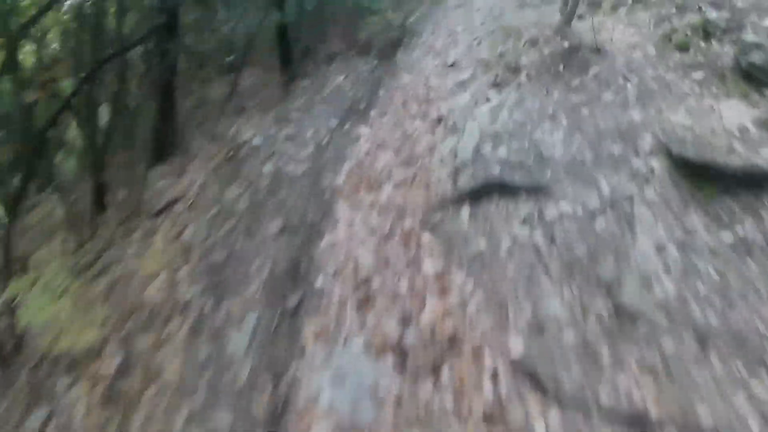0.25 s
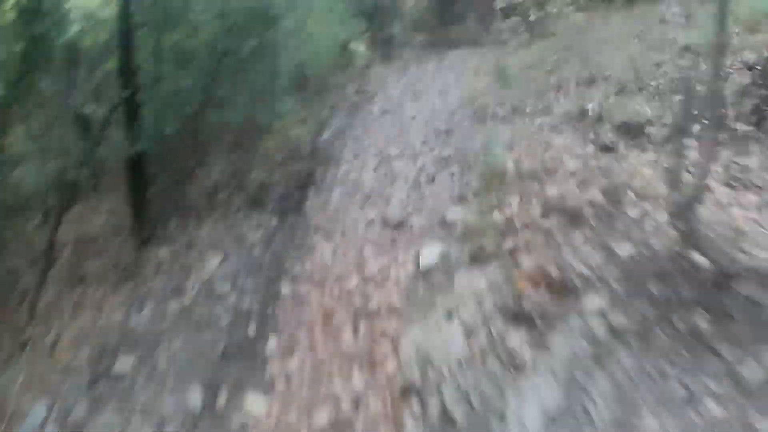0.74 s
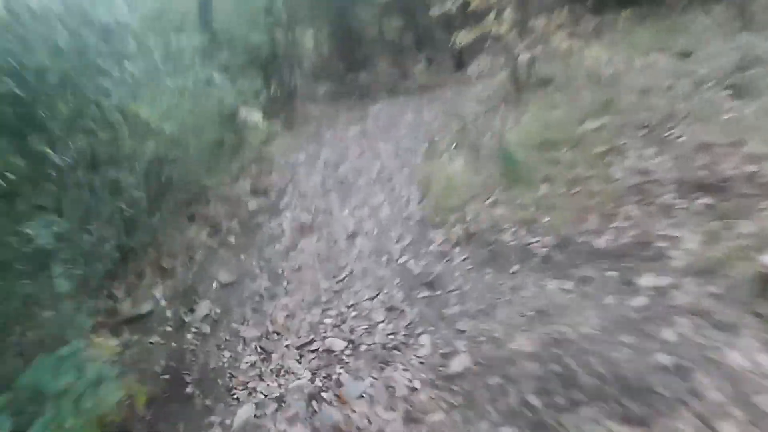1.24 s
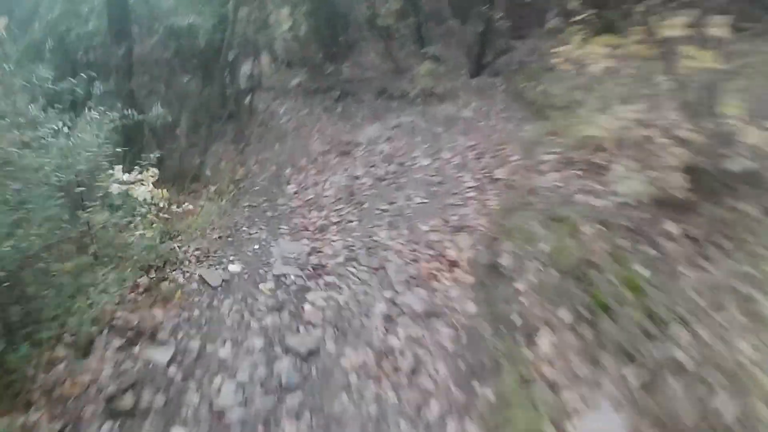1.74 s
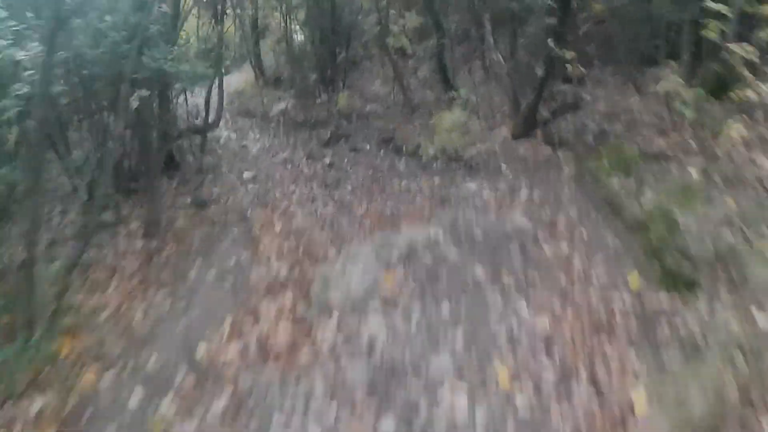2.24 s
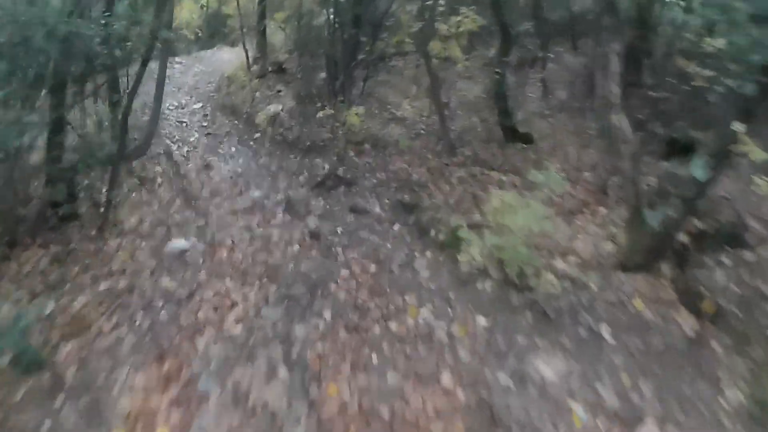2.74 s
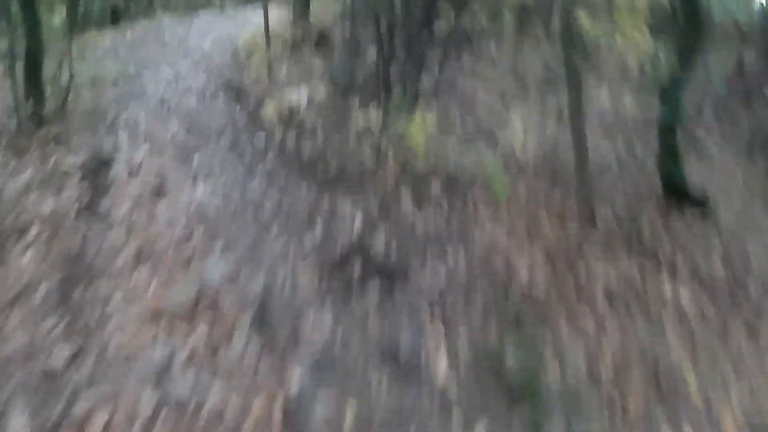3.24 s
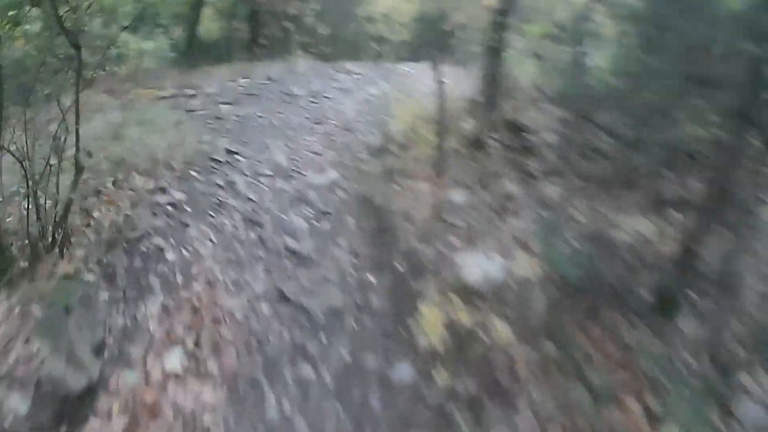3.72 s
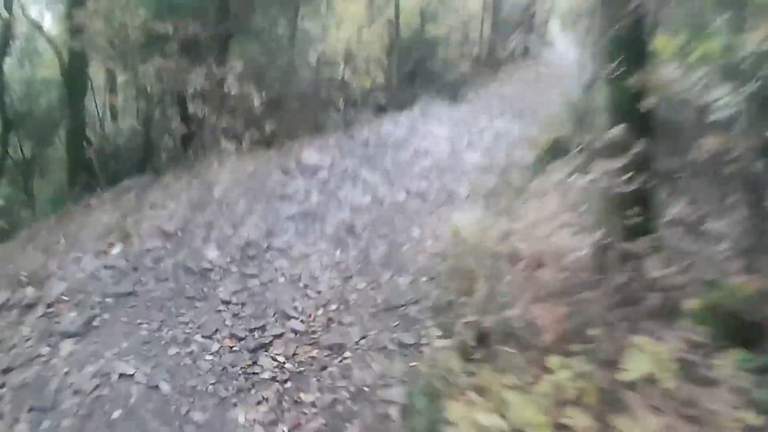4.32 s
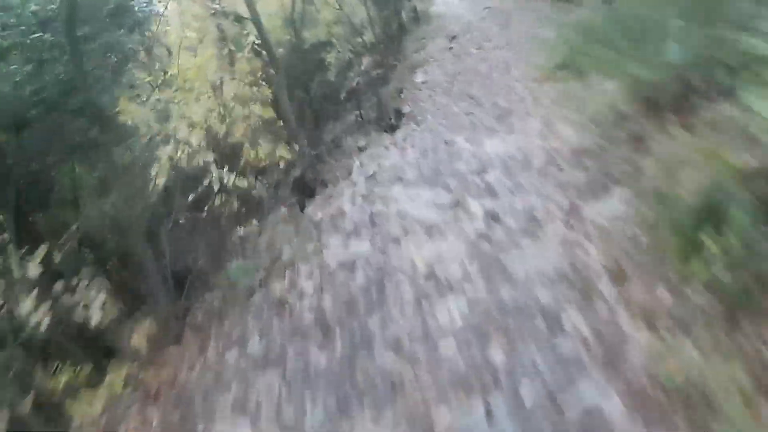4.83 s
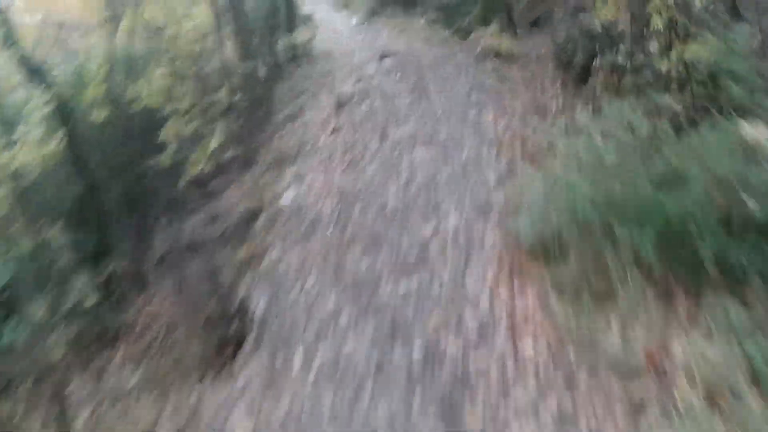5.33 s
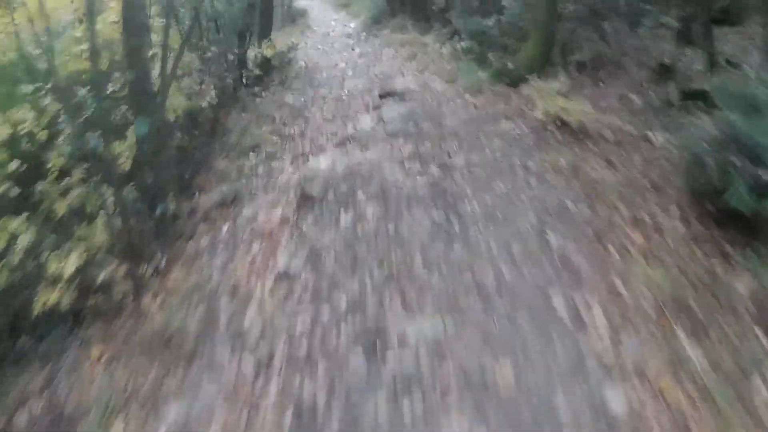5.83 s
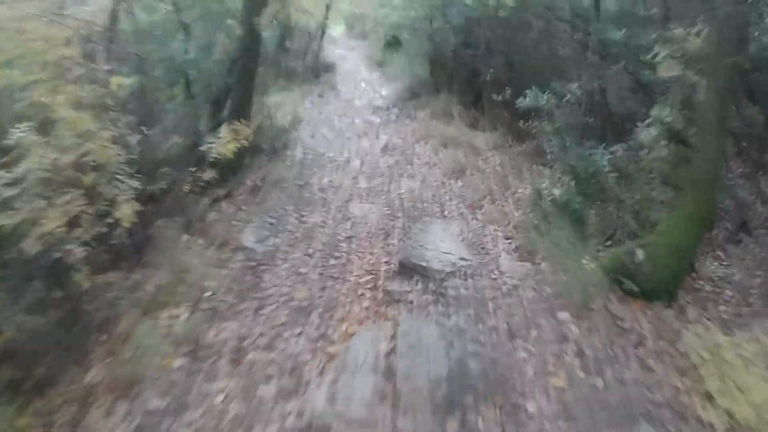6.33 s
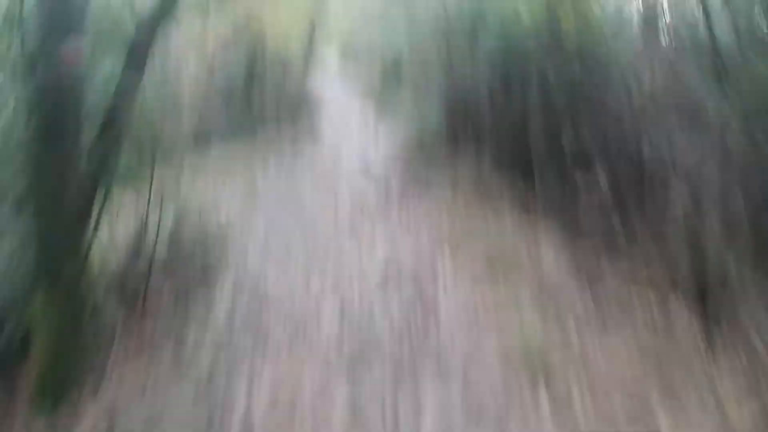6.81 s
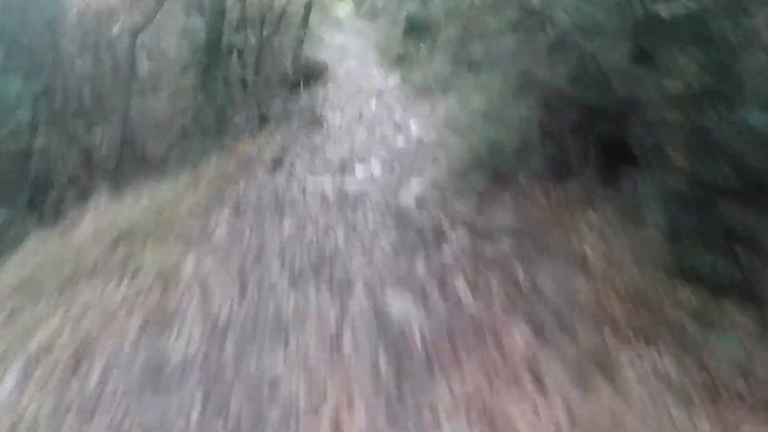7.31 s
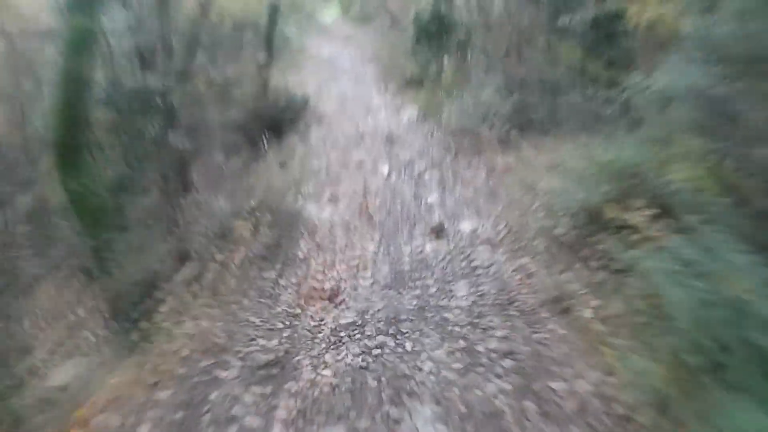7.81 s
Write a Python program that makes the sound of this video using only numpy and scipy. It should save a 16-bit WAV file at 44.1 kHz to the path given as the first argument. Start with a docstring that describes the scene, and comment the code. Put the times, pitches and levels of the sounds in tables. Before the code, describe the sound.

Continuous rough rolling outdoors, close and dry: drumming tyres, crackling loose stones and uneven metallic and hollow chain knocks. Short slides scrape up bursts of grit, and brief lulls open where the tyres run light. Rocks hit with dull booms and rough knocks, the hardest clack after the midpoint. Gusty low wind rumbles on the bike-mounted microphone above a faint steady hiss, and the stony crunch thickens towards the finish.

```python
"""Mountain bike on a rocky trail

A mountain bike coasts fast down a rocky woodland trail, heard through a microphone that rides along.
Tyre hum and stone crunch are trains of random impacts, filtered by the resonances of tyre and bike.
Chain and stones clack as short contact forces that ring the bike; rocks thump as heavy pushes with
a decaying tyre boom and a noisy knock. Wind is low-frequency noise, over a faint steady hiss."""
import sys
import numpy as np
from scipy import signal
from scipy.fft import rfft, irfft, next_fast_len
from scipy.io import wavfile
from scipy.ndimage import uniform_filter1d

SR = 44100
rng = np.random.default_rng(int(sys.argv[2]) if len(sys.argv) > 2 else 0)


def master_out(mix):
    """Clip the mix to full scale and print it as 16-bit PCM to the path in sys.argv[1]."""
    frames = np.transpose(np.atleast_2d(mix))
    ceiling = np.clip(frames, -1, 1)
    pcm = np.round(ceiling * 32767).astype(np.int16)
    wavfile.write(sys.argv[1], SR, pcm)


N = 355446
TIME = np.arange(N) / SR


def from_db(db):
    """Logarithmic level: decibels to amplitude gain."""
    return 10 ** (np.asarray(db) / 20)


def rms_one(x):
    """Effective value: scale to rms 1."""
    return x / np.sqrt(np.mean(x ** 2) + 1e-20)


def peak_one(x, size):
    """Short-time power: scale so that the loudest stretch of size samples has rms 1."""
    return x / np.sqrt(uniform_filter1d(x ** 2, size).max() + 1e-20)


def in_time(rows):
    """Linear interpolation: the level of a (time, level) curve at every sample."""
    s, level_db = np.transpose(rows)
    return np.interp(TIME, s, level_db)


def bump(s, half_s):
    """Gaussian pulse: a smooth rise and fall of height 1 around time s."""
    return np.exp(-((TIME - s) / half_s) ** 2)


def drift(rate_hz):
    """Low-passed noise: a slow random fluctuation of rms 1."""
    count = N // 20  # computed at a twentieth of the sample rate
    hz = np.fft.rfftfreq(count, 20 / SR)
    slow = irfft(rfft(rng.standard_normal(count)) / (1 + (hz / rate_hz) ** 2))
    return np.interp(np.arange(N) / 20, np.arange(len(slow)), rms_one(slow))


def band_pass(x, low_hz, high_hz, order=4):
    """Causal Butterworth filter: a maximally flat pass band."""
    sos = signal.butter(order, [low_hz, high_hz], "band", fs=SR, output="sos")
    return signal.sosfilt(sos, x + 1e-18)


def resonate(x, spectrum, modes=()):
    """Minimum-phase filtering: a broad spectrum with resonant humps, made causal through its cepstrum."""
    size = 2 * next_fast_len(len(x))
    hz = np.fft.rfftfreq(size, 1 / SR) + 1
    points, levels = np.transpose(spectrum)
    db = np.interp(np.log(hz), np.log(points), levels)
    for centre, width, lift in modes:
        db = db + lift / (1 + ((hz - centre) / width) ** 2) ** 2
    # folding the cepstrum onto positive times gives minimum phase
    cepstrum = irfft(np.log(from_db(db)))
    cepstrum[1:size // 2] *= 2
    cepstrum[size // 2 + 1:] = 0
    return irfft(rfft(x, size) * np.exp(rfft(cepstrum)))[:len(x)]


def grains(per_s, spread_db):
    """Random (Poisson-like) impulse train: tiny impacts of uneven size and either sign."""
    sizes = from_db(spread_db * np.minimum(rng.exponential(1, N), 4))
    struck = rng.random(N) < per_s / SR
    return struck * sizes * rng.choice([-1, 1], N)


def add(out, s, sound):
    """Superposition: mix a sound in at time s."""
    at = max(0, round(s * SR))
    out[at:at + len(sound)] += sound[:max(0, N - at)]


def hiss():
    """White noise: equal power at every frequency, at a constant level."""
    return from_db(-60.5) * rng.standard_normal(N)


# Spectrum of the wind noise: (frequency [Hz], level per Hz [dB])
WIND_SPECTRUM = [(4, -11), (10, 4.5), (16, 7), (25, -7.5), (40, -14), (60, -22), (120, -34.5), (300, -53),
                 (1000, -75)]
# Heavy jolts shake the microphone and lift the low rumble: (time [s], lift [dB], half length [s])
SHAKES = [(3.346, 7.5, 0.14), (4.05, 12.5, 0.15), (4.594, 7.5, 0.24), (5.435, 8.5, 0.071),
          (6.913, 10.5, 0.1), (7.767, 0, 0.14)]
WIND_DB, CRUISE_ROAR_DB = -37.5, -46.5  # wind and tyre roar at cruising speed
WIND_FOLLOWS = 0.4  # wind dB per dB of change in the roar


def wind(roar_db):
    """Turbulent pressure: eddies rock the microphone slowly and deeply, more with speed and when jolts shake
    it."""
    shakes_db = sum(lift_db * bump(s, half_s) for s, lift_db, half_s in SHAKES)
    speed_db = WIND_FOLLOWS * (roar_db - CRUISE_ROAR_DB)
    wind_db = WIND_DB + speed_db + shakes_db + 1.02 * drift(12.4)
    eddies = resonate(rng.standard_normal(N + SR), WIND_SPECTRUM)[SR:]
    # even out the noise's own swells, so that wind_db sets the level
    swell = np.sqrt(uniform_filter1d(band_pass(eddies, 20.1, 90) ** 2, SR // 6) + 1e-12)
    return eddies / swell * from_db(wind_db)


# Rolling speed, as the roar of the tyres: (time [s], level [dB])
ROAR = [(0.0, -49), (0.65, -50.5), (0.99, -44.5), (1.28, -46.5), (1.84, -42), (2.69, -47), (3.23, -40),
        (3.48, -50), (4.13, -46.5), (6.06, -44), (6.2, -43), (8.06, -38)]


def rolling_level():
    """Rolling noise grows with speed: the roar level stands for the speed throughout."""
    return in_time(ROAR)


# Spectrum of the tyre roar: (frequency [Hz], level per Hz [dB])
TYRE_SPECTRUM = [(30, 13), (60, -8), (110, -10), (170, 6), (240, 3), (420, -1), (600, -0.5), (800, -6.5),
                 (1100, -2.5), (2000, -35.5)]
# Hollow tyre and rim resonances: (frequency [Hz], width [Hz], lift [dB])
TYRE_MODES = [(99, 31, 18), (291.2, 19, 10.5), (342, 43.4, 12.5), (526, 63, 6), (718, 7.6, 8.5)]


def tyres(roar_db):
    """Cavity resonance: knobs drum on the dirt and sound the hollow tyres."""
    roar = resonate(grains(per_s=2500, spread_db=1.5), TYRE_SPECTRUM, TYRE_MODES)
    roar = roar / np.std(band_pass(roar, 230, 900))
    return roar * from_db(roar_db + drift(8.3))


# Amount of loose stone under the tyres, as its crunch: (time [s], level [dB])
GROUND = [(0.0, -47), (0.43, -42), (0.76, -44), (1.82, -41), (2.62, -45.5), (2.8, -47), (3.03, -46),
          (3.23, -37), (3.3, -37), (3.61, -47), (3.77, -47.5), (3.93, -42.5), (6.31, -43), (6.76, -47),
          (6.96, -37.5), (7.32, -44), (7.56, -38.5), (8.06, -38)]
# Tyres go light or cross smooth dirt and the crunch drops: (time [s], dip [dB], half length [s])
LULLS = [(0.181, 8.5, 0.018), (0.6, 9, 0.031), (2.92, 14, 0.053), (3.711, 12, 0.023), (4.786, 6, 0.047),
         (5.798, 13, 0.01), (6.66, 6, 0.041)]


def ground_level():
    """Contact noise follows the loose stone under the tyres and dips where they go light or run smooth."""
    dips_db = sum(dip_db * bump(s, half_s) for s, dip_db, half_s in LULLS)
    return in_time(GROUND) - dips_db


# A tyre slides or bites into a loose patch:
# (time [s], rattle lift [dB], grit lift [dB], half length [s])
SLIDES = [(1.82, 2, 9, 0.025), (2.039, 13, 7.5, 0.012), (2.263, 7.5, 5, 0.014), (3.2, 14, 3, 0.011),
          (3.321, 4, 1, 0.051), (3.768, 8, 3, 0.019), (3.856, 12.5, 10, 0.0077), (4.693, 7, 10, 0.012),
          (5.54, 5, 7, 0.049), (6.115, 6.5, 8, 0.06)]


def slide_lifts():
    """Sliding friction: brief lifts of coarse rattle and fine grit, each by its own amount."""
    coarse_db = sum(lift_db * bump(s, half_s) for s, lift_db, _, half_s in SLIDES)
    fine_db = sum(lift_db * bump(s, half_s) for s, _, lift_db, half_s in SLIDES)
    return coarse_db, fine_db


def crunch(ticks, edges_hz, clumps_db, patchy_db):
    """Independent modulation: each size of stone swells by itself within the common clumps."""
    sizes = [band_pass(ticks, low, high) for low, high in zip(edges_hz, edges_hz[1:])]
    swelling = sum(part * from_db(clumps_db + patchy_db * drift(28)) for part in sizes)
    return swelling / np.std(sum(sizes))


# Spectrum of stone ticks: (frequency [Hz], level per Hz [dB])
STONE_SPECTRUM = [(300, 11), (700, -3), (1200, -9), (2200, 3.5), (2800, -5), (4500, -2.5), (6000, -1.5),
                  (6800, -13), (9000, -20), (12000, -26), (16000, -67)]
# Resonances of the bike, shared by stones and clacks: (frequency [Hz], width [Hz], lift [dB])
BIKE_MODES = [(1027, 312, 13.5), (1360, 153, 18), (1539, 174, 14), (1951, 92, 6.5), (2200, 56, 1),
              (2630, 74, 4.5), (3070, 250, 10), (3420, 318, 18), (4063, 340, 14.5), (4830, 357, 14),
              (5360, 530, 5), (7710, 1000, 5), (9770, 700, 6.5)]
RATTLE_DB, GRIT_DB, LEAF_DB = -3.5, -4, -18.5  # coarse gravel, fine grit, dry leaves, re the crunch
# knobs bite into clumps of stones: rate [1/s], ceiling of the lift [dB], decay time [s]
BITES_PER_S, BITE_DB, BITE_S = 20, 7, 0.018


def gravel(rattle_db, grit_db, leaf_db):
    """Granular impacts: stones shift in abrupt, dying clumps and ring the bike; leaves crackle on top."""
    starts = rng.random(N) < BITES_PER_S / SR
    bites = signal.lfilter([1], [1, -np.exp(-1 / (BITE_S * SR))], starts + 1e-18)
    bites = np.tanh(bites)  # overlapping bites saturate
    clumps_db = 3.16 * drift(27.5) + BITE_DB * (bites - bites.mean())
    ticks = resonate(grains(per_s=4200, spread_db=2.0), STONE_SPECTRUM, BIKE_MODES)
    rattle = crunch(ticks, (710, 1203, 1743, 2590), clumps_db, patchy_db=2.5)
    grit = crunch(ticks, (2470, 3800, 4310, 5700), clumps_db, patchy_db=1.5)
    leaves = crunch(ticks, (6400, 8800, 13000), 0.81 * clumps_db, patchy_db=0.5)
    stones = from_db(rattle_db + RATTLE_DB) * rattle + from_db(grit_db + GRIT_DB) * grit
    return stones + from_db(leaf_db + LEAF_DB) * leaves


def pebbles(rattle_db, grit_db):
    """Size sets pitch: single pebbles scuff the bike as short noise bursts, each size in its own band."""
    out = 0
    fade = np.exp(-1 / (0.0011 * SR))
    for hz in np.geomspace(1700, 7000, num=7):
        touches = np.abs(grains(per_s=13, spread_db=2.0))
        envelope = signal.lfilter([1], [1, -2 * fade, fade ** 2], touches + 1e-18)  # rises, then fades
        scuff = envelope * rng.standard_normal(N)
        tick = band_pass(scuff, hz / 1.3, hz * 1.3, order=2)
        out = out + rms_one(tick) * from_db(rattle_db if hz < 2800 else grit_db)
    return from_db(-20.0) * resonate(out, STONE_SPECTRUM, BIKE_MODES)


# Spectrum of a rock's push: (frequency [Hz], level per Hz [dB])
THUMP_SPECTRUM = [(20, -15), (50, -3), (90, 0), (200, -3), (300, -9.5), (500, -30.5), (1000, -53),
                  (3000, -72)]
# Low flex of the frame: (frequency [Hz], width [Hz], lift [dB])
FRAME_MODE = (212, 55, 4.9)
# Rocks and roots jolt the bike: (time [s], thump level [dB], hardness [0-1])
JOLTS = [(0.791, -36.5, 0.05), (1.499, -39.5, 0.05), (1.617, -35.5, 0.17), (3.05, -35.5, 0.01),
         (3.134, -17, 0.41), (3.4, -23.5, 0.4), (4.15, -33.5, 0.75), (4.636, -40, 0), (5.358, -42, 0),
         (5.5, -26.5, 0.76), (6.827, -24.5, 0.84), (6.88, -16, 0.5), (6.924, -24, 1), (7.169, -29.5, 0.26),
         (7.383, -28.5, 0.45)]
TYRE_BOOM_HZ, TYRE_BOOM_S = 93.6, 0.014  # pitch and decay time
BOOM_RANGE_DB, KNOCK_RANGE_DB = [13.0, -15], [-22.5, 3]  # re thump, at hardness 0 and 1


def jolts():
    """Impact hardness sets bandwidth: soft blows boom in the tyre, hard ones give a rough knock."""
    out, t = np.zeros(N), np.arange(SR // 5) / SR
    for s, level_db, hardness in JOLTS:
        boom_db = np.interp(hardness, [0, 1], BOOM_RANGE_DB)
        knock_db = np.interp(hardness, [0, 1], KNOCK_RANGE_DB)
        shudder = rng.standard_normal((2, len(t)))
        force = 0.036 * shudder[0] * np.exp(-t / 0.024) - (t == 0)  # one push, then a shudder
        push = peak_one(resonate(force, THUMP_SPECTRUM, [FRAME_MODE]), size=256)
        boom = -np.sin(2 * np.pi * TYRE_BOOM_HZ * t) * np.exp(-t / TYRE_BOOM_S)
        knock = peak_one(band_pass(shudder[1] * np.exp(-t / 0.0066), 320, 1330), size=256)
        add(out, s, from_db(level_db) * (push + from_db(boom_db) * boom + from_db(knock_db) * knock))
    return out


# Spectrum of a hard contact with the bike: (frequency [Hz], level per Hz [dB])
STRIKE_SPECTRUM = [(950, -12), (1450, -8), (2400, 4.5), (2900, -8.5), (6000, -5), (10000, -24.5),
                   (14000, -35)]
HOLLOW_BELOW_HZ, HOLLOW_DB_PER_OCTAVE = 2220, 13.5  # the lower a clack rings, the more hollow body
RING_LIFT_DB = 9.5  # lift of the main ring
DEBRIS_DB, DEBRIS_S = -16, 0.016  # loose bits after a clack: level re the snap, decay time


def clack(ring_hz, contact_ms, edge_db):
    """Forced resonance: a contact rings the bike, ragged if long, and loose bits patter on faintly."""
    t = np.arange(SR // 8) / SR
    age = 1000 * t / contact_ms
    ragged = from_db(5.3 * rms_one(uniform_filter1d(rng.standard_normal(len(t)), size=70)))
    onset = np.minimum(t / 0.00062, 1)
    force = onset * (np.exp(-age ** 2) + from_db(-15.5) * np.exp(-t / 0.011)) * ragged
    ring = (ring_hz, ring_hz / 10, RING_LIFT_DB)
    hit = resonate(force * rng.choice([-1, 1], len(t)), STRIKE_SPECTRUM, list(BIKE_MODES) + [ring])
    hollow = from_db(HOLLOW_DB_PER_OCTAVE * np.log2(HOLLOW_BELOW_HZ / ring_hz))
    body = hollow * peak_one(band_pass(hit, 1210, 2605), size=128)
    snap = peak_one(band_pass(hit, 2810, 6160), size=128)
    edge = from_db(edge_db) * peak_one(band_pass(hit, 6840, 0.48 * SR), size=128)
    patter = rng.standard_normal(len(t)) ** 3 * np.minimum(t / 0.00073, 1) * np.exp(-t / DEBRIS_S)
    debris = from_db(DEBRIS_DB) * peak_one(resonate(patter, STONE_SPECTRUM, BIKE_MODES), size=128)
    return (body + snap + debris) / np.hypot(1, hollow) + edge


CHATTER_DB, CHATTER_SPREAD_DB = 6.5, 0.5  # level re the crunch, and its spread either way
CHATTER_EDGE_DB, CHATTER_CONTACT_MS = -10.5, 2.8  # bright edge re level; middle contact time


def chatter(ground_db, count):
    """Modal excitation: light clacks at uneven intervals ring strong bike modes, louder on stony ground."""
    out = np.zeros(N)
    rings_hz = [hz for hz, _, lift_db in BIKE_MODES if hz > 1200 and lift_db > 11]
    for k, (delay, place, force, length) in enumerate(rng.random((count, 4))):
        at = int((k + delay) / count * N)
        level_db = ground_db[at] + CHATTER_DB + CHATTER_SPREAD_DB * (2 * force - 1)
        contact_ms = CHATTER_CONTACT_MS * 2 ** (2 * length - 1)
        ring_hz = rings_hz[int(place * len(rings_hz))]
        add(out, at / SR, from_db(level_db) * clack(ring_hz, contact_ms, CHATTER_EDGE_DB))
    return out


# Chain and stones hit the bike hard:
# (time [s], level [dB], main ring [Hz], contact [ms], bright edge re level [dB])
CLACKS = [(0.2602, -29.5, 3470, 1.7, -34), (0.313, -20.5, 3070, 4.6, -22), (0.3378, -23.5, 3420, 1.5, -34),
          (0.4612, -29, 1450, 2.6, -32), (0.4817, -25.5, 1560, 6.4, -21), (1.4971, -20.5, 1430, 1.4, -45),
          (1.7477, -14.5, 1470, 3.7, -40), (1.821, -11, 5500, 4.4, -15.5), (2.1115, -28, 1490, 13, -17),
          (2.3465, -25, 1670, 1.6, -14), (2.466, -24.5, 1920, 19, -18.5), (2.6886, -37.5, 5000, 5.3, -5),
          (2.8343, -37, 5400, 6.2, -7), (3.0838, -27.5, 1360, 3.6, -19), (3.1127, -23.5, 4300, 2.4, -18),
          (3.7553, -32.5, 1600, 5.2, -24), (3.8863, -29, 3370, 2.5, -23), (4.1498, -28.5, 7840, 4.3, 4),
          (4.1726, -29.5, 1570, 3.5, -35), (4.4403, -22, 3410, 2, -25), (5.0018, -22.5, 4100, 3.3, -15),
          (5.321, -12, 1730, 2.1, -23), (5.329, -19.5, 1580, 4.7, -31), (5.3566, -24.5, 1580, 6.3, -35),
          (5.4996, -3, 1590, 6.6, -15.5), (5.503, -6.5, 1580, 1.4, -26), (5.5198, -10, 3620, 3.4, -37),
          (5.6883, -16, 4640, 5.1, -33), (5.7257, -26.5, 4840, 9.7, -15), (6.0652, -28, 1460, 14, -13),
          (6.2635, -24.5, 4800, 3.6, -20), (6.556, -27.5, 1660, 1.7, -37), (6.8272, -24, 1960, 4, -11.5),
          (6.8828, -24, 2000, 10.2, -22), (6.9214, -19, 4200, 1.8, 1), (6.927, -21.5, 1440, 2.1, 1),
          (7.0885, -26, 3360, 4.9, -20), (7.1724, -34, 1550, 5.9, 0.5), (7.382, -16.5, 3200, 2.3, -19),
          (7.5291, -13.5, 3730, 3.6, -15), (7.8816, -21.5, 1280, 5.1, -17),
          (8.0308, -14.5, 3040, 1.03, -12.5)]


def clacks():
    """Impact sound: the hard hits of chain and stones, each with its own ring and contact time."""
    out = np.zeros(N)
    for s, level_db, ring_hz, contact_ms, edge_db in CLACKS:
        add(out, s, from_db(level_db) * clack(ring_hz, contact_ms, edge_db))
    return out


def scene():
    """Superposition in open air: speed drives tyres and wind, loose ground drives the stones."""
    roar_db, ground_db = rolling_level(), ground_level()
    coarse_db, fine_db = slide_lifts()
    rattle_db, grit_db = ground_db + coarse_db, ground_db + fine_db
    leaf_db = ground_db + 0.78 * fine_db  # leaves get a share of the grit's lift
    background = hiss() + wind(roar_db) + tyres(roar_db)
    stones = gravel(rattle_db, grit_db, leaf_db) + pebbles(rattle_db, grit_db)
    hits = jolts() + chatter(ground_db, count=64) + clacks()
    return (background + stones + hits)[None]


def record(dry):
    """Overload and band limit: peaks clip, then a steep elliptic low-pass cuts the top."""
    low_pass = signal.ellip(10, 0.1, 70, 15850, fs=SR, output="sos")  # ripple [dB], stop [dB], cutoff [Hz]
    return signal.sosfilt(low_pass, np.clip(dry, -0.95, 0.95))


dry = scene()
out = record(dry)
master_out(out)
```